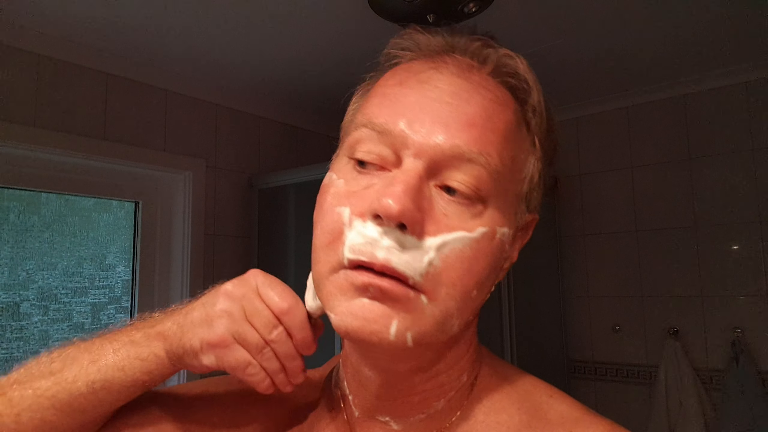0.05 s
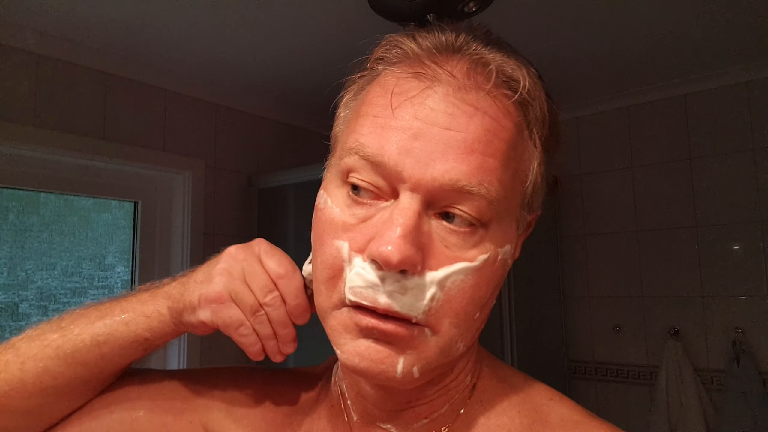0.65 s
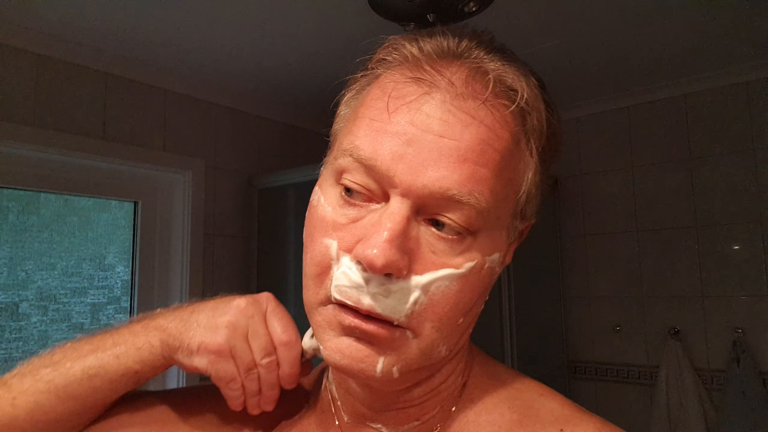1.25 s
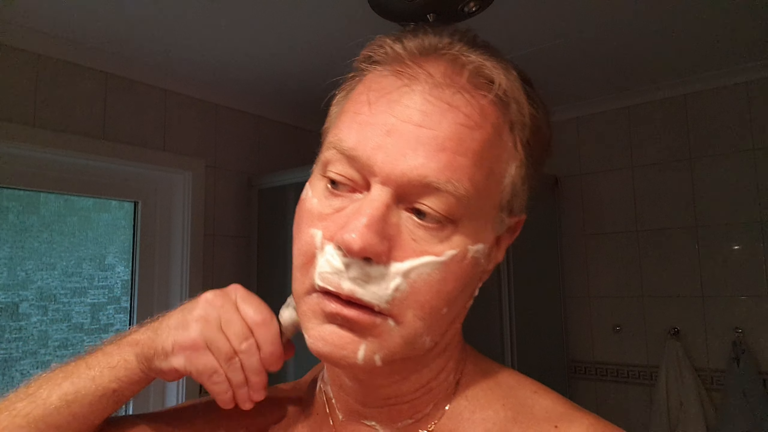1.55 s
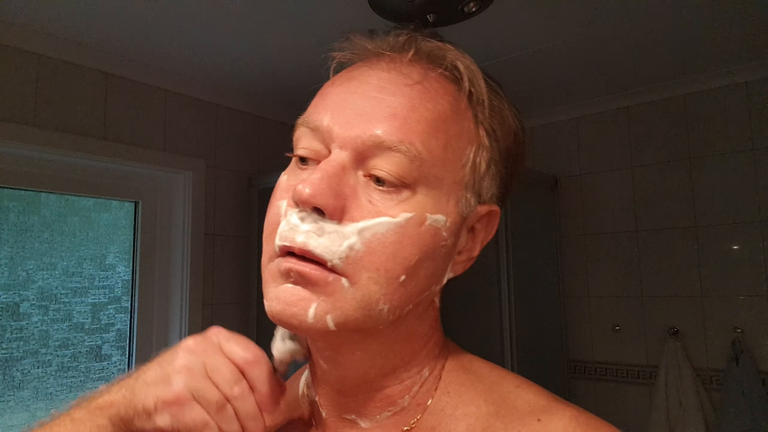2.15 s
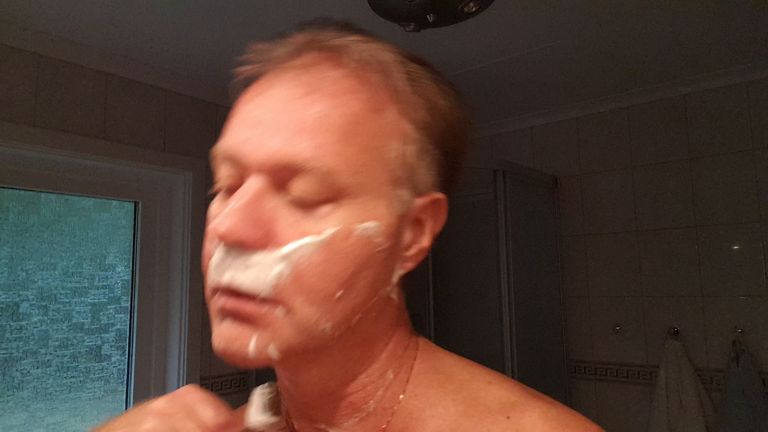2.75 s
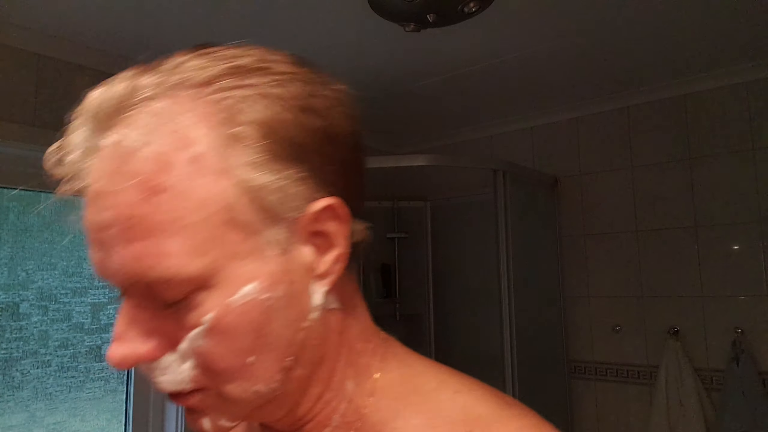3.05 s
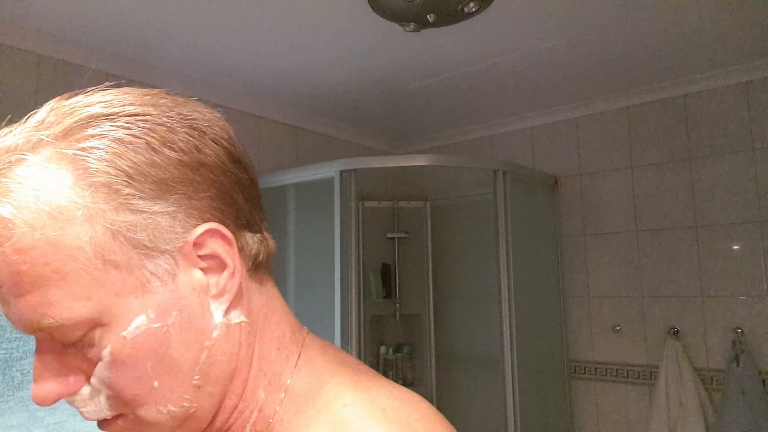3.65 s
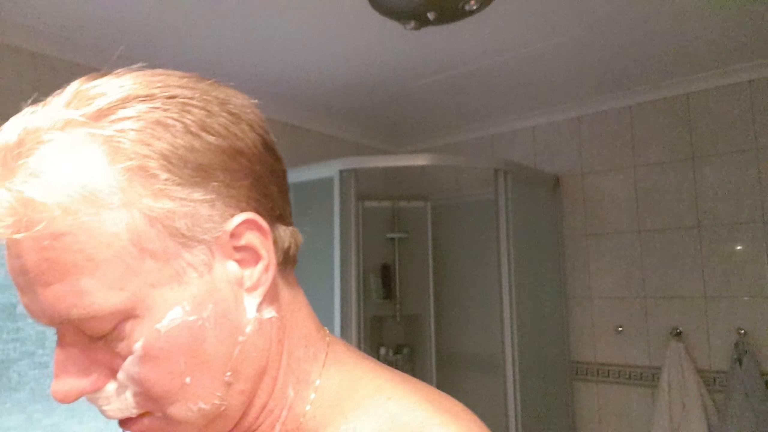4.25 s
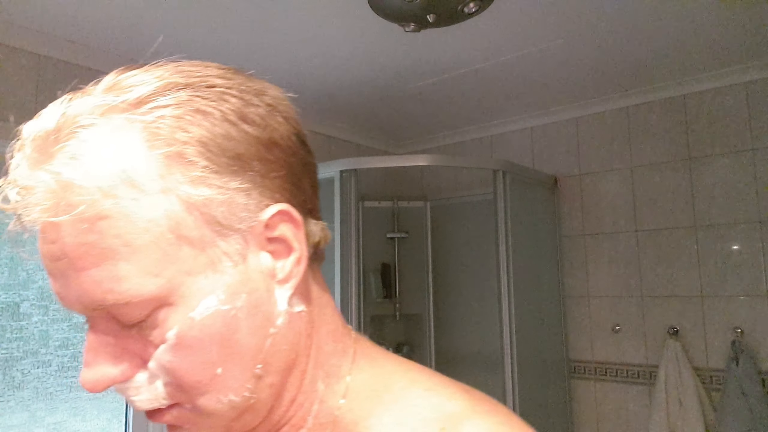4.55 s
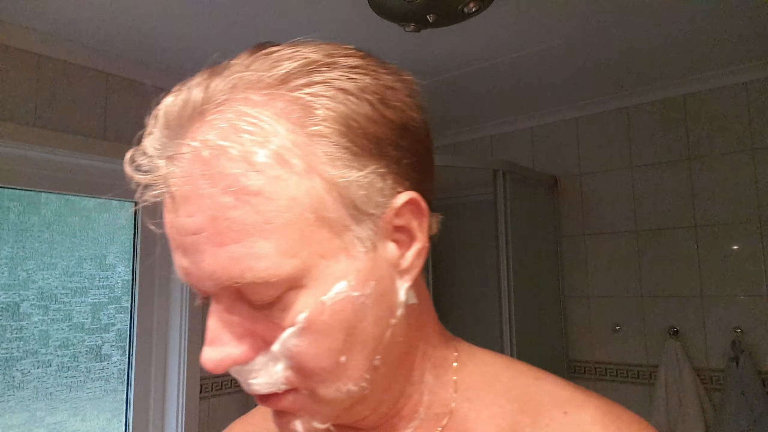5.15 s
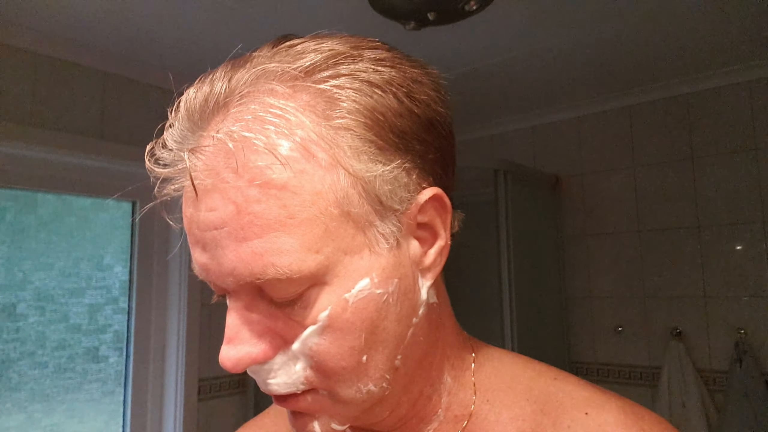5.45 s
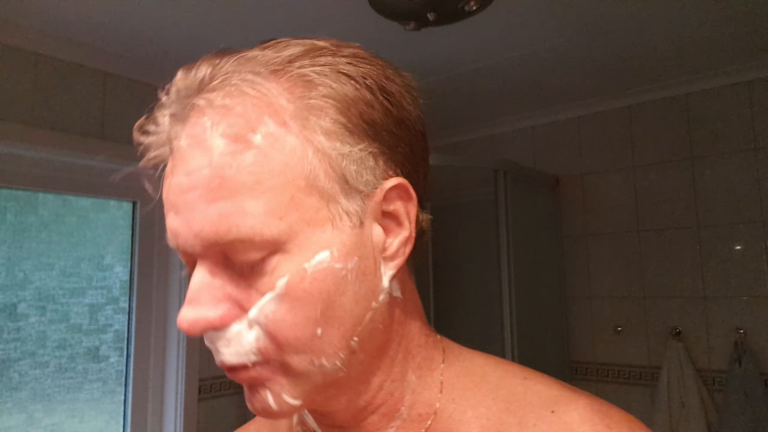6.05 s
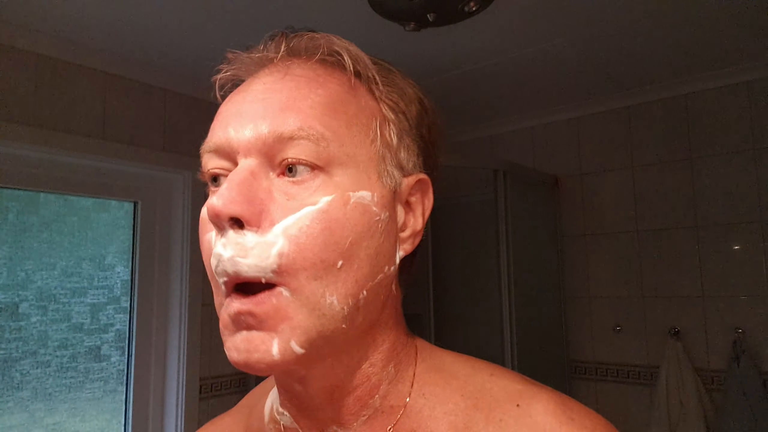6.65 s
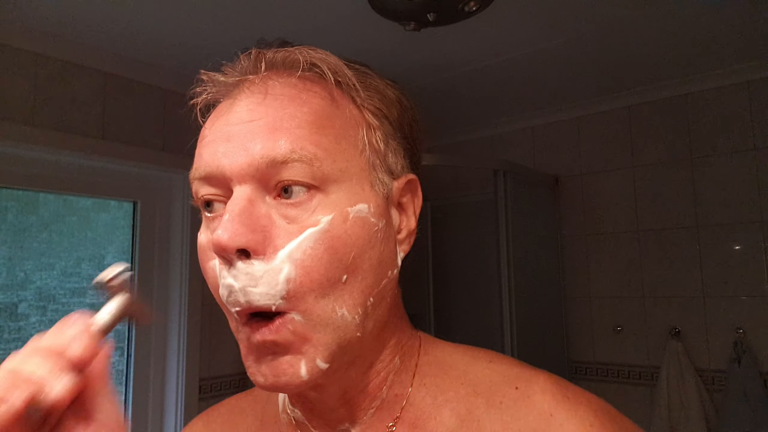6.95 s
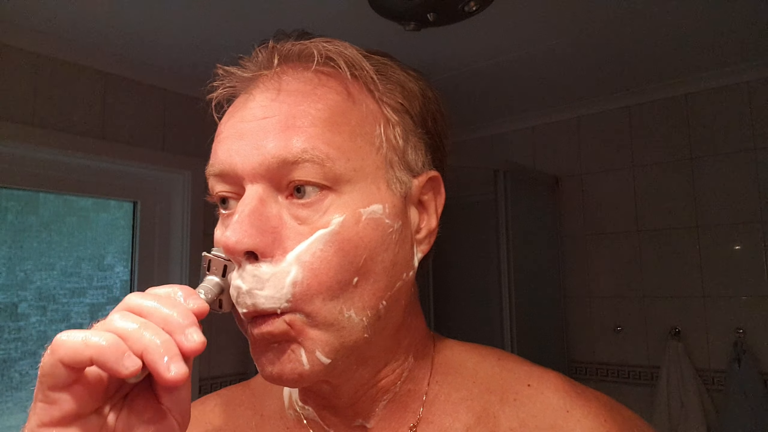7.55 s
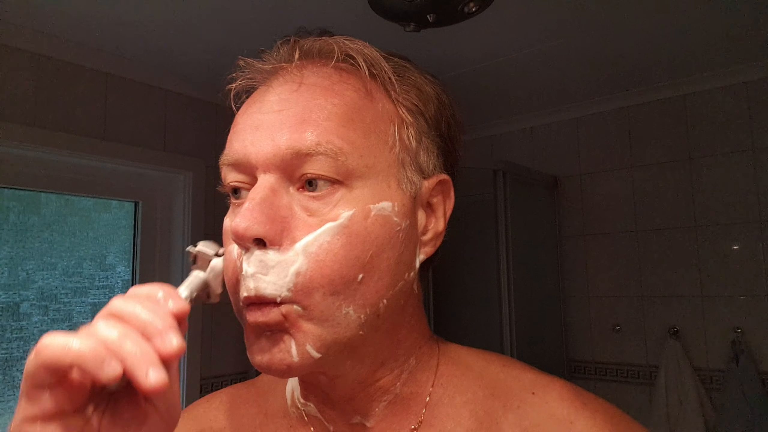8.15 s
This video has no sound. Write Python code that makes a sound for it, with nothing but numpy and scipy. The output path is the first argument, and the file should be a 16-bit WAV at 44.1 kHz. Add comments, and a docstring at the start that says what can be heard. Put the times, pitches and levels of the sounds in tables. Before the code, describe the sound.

Short razor strokes on stubble come before and after a few seconds of rinsing under a running tap, with a glugging drain.

```python
"""Over the low hum of ventilation in a small tiled bathroom, a man shaves his neck in a few strokes,
each cut hair a tiny impulse. At 3.5 s the tap lever knocks; the jet then breaks into hissing drops
and splashes as he rinses the razor. From 4.2 s bubbles glug and excite the air in the waste pipe.
The tap shuts at 6.5 s and the drain slurps dry. Last, at 7.7 s, comes one stroke on the upper lip."""
import sys
import numpy as np
from scipy import signal
from scipy.fft import rfft, irfft
from scipy.io import wavfile

SR = 44100
rng = np.random.default_rng(int(sys.argv[2]) if len(sys.argv) > 2 else 0)


def wrap_up_sound(samples):
    """Save the sound to the file named by the first command line argument, as 16-bit audio."""
    columns = np.atleast_2d(samples).T
    # keep every value between -1 and 1, then stretch to whole-number steps
    tamed = np.clip(columns, -1, 1)
    steps = np.round(tamed * 32767).astype(np.int16)
    wavfile.write(sys.argv[1], SR, steps)


N = 370440
TIME = np.arange(N) / SR
TAP_OPEN_S, TAP_SHUT_S, DRAIN_DRY_S = 3.715, 6.5, 7.07

# Spectrum of the blade on the neck. Each row: frequency in Hz, relative level in dB.
NECK_SPECTRUM = [(800, -46), (1150, -14.5), (1600, -8), (2100, -21), (3300, -13), (4000, -18), (5000, -14),
                 (6400, -11), (8500, -4.5), (11100, 1.5), (14800, -3), (16000, -0.5)]
# Churning once the trap has filled. Each row: time in seconds, relative level in dB.
CHURN_CURVE = [(4.17, -69.5), (4.2, -52), (4.72, -46.5), (4.75, -44.5), (5.81, -44), (5.83, -40),
               (6.58, -39.5), (6.67, -49), (6.86, -41), (7.55, -76.5)]


def shaving():
    """Skin and stubble colour the blade's excitation, so neck and lip each have their own spectrum."""
    # Strokes on the neck. Each row: start, time to full bite and length in seconds, then
    # relative cutting level, relative rubbing level and easing of the bite in dB.
    neck_strokes = [(0.06, 0.15, 0.26, -51.5, -82.5, 1), (0.79, 0.18, 0.35, -68, -82.5, 1.5),
                    (1.18, 0.02, 0.13, -64, -75, 15), (1.735, 0.082, 0.2, -57, -74, 6),
                    (2.283, 0.012, 0.17, -50, -79.5, 20.5), (2.7, .035, .17, -77, -85.5, 0)]
    # Short pulls on the upper lip, with the same columns.
    lip_pulls = [(7.68, 0.074, 0.26, -54.5, -66, 5.5), (7.865, 0.039, 0.17, -54.5, -59, 2.3),
                 (7.99, .088, 0.084, -48, -61, 3)]
    # Spectrum of the blade on the lip. Each row: frequency in Hz, relative level in dB.
    lip_spectrum = [(1000, -22), (1600, -12.5), (2100, -22), (2850, -25), (3250, -4), (3650, -21),
                    (4200, -7), (5100, -6), (5700, -11), (6600, -9.5), (7900, 4), (9300, -3.5), (12200, 5),
                    (16000, 4.5)]
    neck = stubble(neck_strokes, NECK_SPECTRUM, 760, spread_db=6, rub_share=0.85, cut_db=2, rub_db=5)
    lip = stubble(lip_pulls, lip_spectrum, 510, spread_db=8, rub_share=0.8, cut_db=5, rub_db=-5.5)
    return neck + lip


def stubble(strokes, spectrum, hairs_per_s, spread_db, rub_share, cut_db, rub_db):
    """Shot noise and friction: each cut hair is a tiny burst above the duller rubbing of the skin."""
    cutting, rubbing = np.max([stroke(*row) for row in strokes], 0)
    fade = np.exp(-np.arange(SR // 100) / SR / 0.00045)
    bursts = unit_rms(signal.oaconvolve(abs(clicks(hairs_per_s, spread_db)), fade)[:N])
    scrape = colour((bursts + rub_share) * rng.standard_normal(N), spectrum)
    crisp = unit_rms(butter(scrape, 3520, "high"))
    dull = unit_rms(butter(scrape, 5240, "low", order=6))
    return amp(cut_db) * cutting * crisp + amp(rub_db) * rubbing * dull


def stroke(start, bite_s, length, cut_db, rub_db, ease_db):
    """Contact sets the gains of cutting and rubbing as the blade lands, bites, eases off and lifts."""
    bite_db = np.interp(TIME - start, [0, bite_s, max(length, bite_s)], [-18, 0, -ease_db])
    contact = envelope(start, start + length, rise_s=0.0024, fall_db_per_s=257)
    return contact * amp([cut_db + bite_db, rub_db + 0.49 * bite_db])


def chatter():
    """Stick-slip friction of the blade rings a resonance that slides as the skin stretches."""
    # Each row: start and length in seconds, relative level in dB, first and last pitch in Hz.
    drags = [(0.05, 0.31, -72.5, 2830, 2400), (0.17, 0.18, -67, 5100, 4570), (1.76, 0.13, -70, 3200, 3700),
             (2.31, .17, -74.5, 1750, 1800), (7.87, 0.17, -58, 4260, 4200)]
    return amp(1) * gliding_rasps(drags, pole_width_hz=640, kicks_per_s=1400)


def snaps(gain_db=1, decay_s=0.00031):
    """Sudden release: stiff hairs and foam snap at the blade, each with one broadband tick."""
    # Each row: time in seconds, relative peak level in dB.
    releases = [(0.367, -37.5), (1.4691, -57), (2.0868, -50.5), (2.3004, -44), (2.5522, -44.5),
                (2.855, -45.5), (7.658, -48), (7.717, -46.5), (7.7593, -54), (7.779, -48), (7.857, -47)]
    out, t = np.zeros(N), np.arange(SR // 40) / SR
    for s, db in releases:
        tick = colour(rng.standard_normal(len(t)) * np.exp(-t / decay_s), NECK_SPECTRUM)
        add(out, s, amp(db + gain_db) * tick / abs(tick).max())
    return out


def tap(hiss_share=0.53, flutter_db=2.5):
    """Impact noise: the aerated jet breaks into thousands of drops on the basin, in uneven gushes."""
    # Each row: frequency in Hz, relative level in dB.
    water_spectrum = [(590, -51.5), (1000, -4), (1500, 0), (1960, -4.5), (2150, -4), (2330, -5),
                      (3340, 1.5), (3670, -3), (5070, -4.5), (5700, -9), (6940, -3), (10200, -2),
                      (11400, -0.5), (14900, -7), (16000, -6.5)]
    spray, splash = jet_gains()
    drops = clicks(per_s=3000, spread_db=6)
    gush = amp(flutter_db * wander(120))
    water = colour((drops + hiss_share * rng.standard_normal(N)) * gush, water_spectrum)
    fine = unit_rms(butter(water, 4730, "high"))
    coarse = unit_rms(butter(water, [1200, 5200], "band"))
    return amp(2) * spray * fine + amp(3) * splash * coarse


def jet_gains(rise_s=0.032, entry_s=0.03):
    """Fine spray and coarse splashing follow the flow, and jump when the razor obstructs the jet."""
    # The razor in the jet. Each row: start and length in seconds, change of spray and of splash in dB.
    rinses = [(4.31, 0.098, 3.5, 5.5), (4.524, 0.15, 3.5, 3), (4.732, 0.17, 2.5, 4.5), (4.95, 0.14, 6, 3.5),
              (5.295, 0.084, 3, 5), (5.456, 0.049, 7.5, 3), (5.575, 0.097, 4, 3.5), (5.947, .19, 7, 1),
              (6.183, 0.34, 5, -1.5)]
    flow = envelope(TAP_OPEN_S, TAP_SHUT_S, rise_s, fall_db_per_s=147.5)
    flow *= amp(0.94 * (TIME - TAP_OPEN_S))  # the lever is eased up
    fizz = amp(-19) * envelope(TAP_SHUT_S, TAP_SHUT_S, rise_s, fall_db_per_s=32.5)  # water left behind
    spray_db, splash_db = -46, -55
    for s, length, extra_spray_db, extra_splash_db in rinses:
        in_jet = np.clip(0.5 + np.minimum(TIME - s, s + length - TIME) / entry_s, 0, 1)
        spray_db += extra_spray_db * in_jet
        splash_db += extra_splash_db * in_jet
    return np.maximum(flow, fizz) * amp(spray_db), flow * amp(splash_db)


def droplets(decay_cycles=11, count=900):
    """Bubble resonance: air trapped by the splashing rings briefly, rising in pitch."""
    out, t = np.zeros(N), np.arange(SR // 50) / SR
    for when, pitch, weakness in rng.random((count, 3)):
        hz = 2000 * 3.5 ** pitch
        age = t * hz / decay_cycles
        plink = np.exp(-age) * np.sin(2 * np.pi * hz * t * (1 + 0.025 * age))
        add(out, TAP_OPEN_S + when * (TAP_SHUT_S - TAP_OPEN_S), plink / np.sqrt(weakness + 0.01))
    _, splash = jet_gains()
    return amp(-5) * splash * unit_rms(out)


def splats(gain_db=2, decay_cycles=14):
    """Damped impacts: slugs of water off the razor slap the basin; larger, lower ones last longer."""
    # Each row: time in seconds, relative peak level in dB, centre frequency in Hz.
    slugs = [(4.1935, -33, 3960), (4.4955, -24.5, 5200), (4.523, -29, 2720), (4.7335, -27, 3760),
             (4.7531, -31.5, 3400), (4.8505, -33.5, 1350), (5.0283, -20, 6700), (5.0614, -25.5, 9000),
             (5.1734, -25.5, 3240), (5.3374, -25, 3440), (5.5122, -30, 3920), (5.567, -29, 3850)]
    out, t = np.zeros(N), np.arange(SR // 12) / SR
    for s, db, hz in slugs:
        burst = rng.standard_normal(len(t)) * np.exp(-t * hz / decay_cycles)
        slap = ring(burst, hz, 0.24 * hz)
        add(out, s, amp(db + gain_db) * slap / abs(slap).max())
    return out


def basin():
    """Forced vibration: the jet drums on the bowl and drives its modes."""
    # Each row: frequency and bandwidth in Hz, relative level in dB.
    bowl_modes = [(231.3, 37, -2.5), (337.5, 64, -2), (530, 59, -10.5), (712, 75, 0.5), (1382, 71, -12.5)]
    _, splash = jet_gains()
    return splash * noisy_modes(bowl_modes)


def drain(pops_per_s=260, spread_db=4.5):
    """Air-column resonance: bursting bubbles ring the waste pipe; churning drives its lowest mode."""
    # Each row: frequency and bandwidth in Hz, relative level in dB.
    pipe_modes = [(386.7, 52, -0.5), (734, 80, -5), (885, 59, -7.5), (1162, 110, -11.5), (1370, 150, -14),
                  (1535, 62, -9), (1692, 59, -16), (2180, 36, -25)]
    times, churn_db = np.transpose(CHURN_CURVE)
    churn = amp(np.interp(TIME, times, churn_db, left=-140, right=-140))
    draining = envelope(times[0], DRAIN_DRY_S, rise_s=0.025, fall_db_per_s=89)
    bubbling = draining * (churn / churn.max()) ** 0.31
    common_pops = clicks(pops_per_s, spread_db)
    lowest, *upper = [amp(db) * ring(common_pops + clicks(pops_per_s, spread_db), hz, width)
                      for hz, width, db in pipe_modes]
    return amp(-4) * churn * lowest + amp(-52.5) * bubbling * unit_rms(sum(upper))


def glugs(gain_db=-1, swell_s=0.0068, rise_per_s=0.61, count=24):
    """Damped oscillation: a big bubble swells and dies, gliding up and stirring the pipe's second mode."""
    # Each row: time in seconds, relative peak level in dB, pitch in Hz.
    big_bubbles = [(4.206, -41, 395), (4.613, -34.5, 416), (4.754, -33, 364), (4.807, -31.5, 384),
                   (4.954, -32.5, 403), (5.066, -45, 363), (5.186, -32, 301), (5.346, -29, 359),
                   (5.832, -29, 392), (5.85, -32, 361), (5.902, -34, 364), (6.022, -30.5, 334),
                   (6.049, -27.5, 323), (6.116, -30, 374), (6.157, -29.5, 303), (6.456, -30, 404),
                   (6.496, -29.5, 330), (6.548, -27.5, 340), (6.806, -32, 380.5), (6.847, -34, 386),
                   (6.994, -35, 397)]
    out, t = np.zeros(N), np.arange(SR // 10) / SR
    swell = t / swell_s * np.exp(1 - t / swell_s)
    # Lesser bubbles come at random, as loud as the churning allows.
    times, churn_db = np.transpose(CHURN_CURVE)
    jitter, pitch = rng.random((count, 2)).T
    starts = times[0] + (np.arange(count) + jitter) / count * (DRAIN_DRY_S - times[0])
    lesser = zip(starts, np.interp(starts, times, churn_db) + 5, np.interp(pitch, [0, 1], [273, 408.6]))
    for s, db, hz in [*big_bubbles, *lesser]:
        cycles = hz * t * (1 + rise_per_s * (t / 2 - swell_s))
        overtone = amp(-16) * np.sin(2 * np.pi * rng.uniform(680, 900) * t)
        add(out, s, amp(db + gain_db) * swell * (np.sin(2 * np.pi * cycles) + overtone))
    return out


def slurp():
    """Air entrainment: air sucked down with the last water rasps and whistles."""
    # Each row: start and length in seconds, relative level in dB, first and last pitch in Hz.
    gulps = [(6.96, 0.11, -47.5, 520, 840), (6.68, 0.38, -60, 1300, 1550), (6.98, 0.14, -53, 1470, 1520),
             (6.88, 0.25, -74, 5000, 5300), (6.95, 0.15, -72.5, 7900, 8800)]
    return gliding_rasps(gulps, pole_width_hz=480, kicks_per_s=3600)


def pops():
    """Pressure release: bubbles burst sharply at the plughole."""
    # Each row: time in seconds, relative level in dB, lower and upper band edge in Hz, T60 in seconds.
    bursts = [(4.496, -34, 605, 794, 0.05), (6.694, -52, 1090, 2050, 0.06), (6.808, -43, 716, 955, 0.032),
              (6.845, -45.5, 740, 1560, 0.095), (6.995, -35, 506, 755, 0.13)]
    return blows(bursts, gain_db=6.5)


def knocks():
    """Impact excitation: the tap lever and pipes knock dully; soft bumps accompany the lip stroke."""
    # Each row: time in seconds, relative level in dB, lower and upper band edge in Hz, T60 in seconds.
    impacts = [(3.481, -60, 250, 1900, 0.5), (3.607, -54.5, 101, 2210, 1), (3.62, -35, 49.7, 590, 0.37),
               (3.645, -45, 91, 614, 0.19), (6.41, -32, 212, 280, 0.8), (6.428, -22.5, 55.5, 136, 0.22),
               (6.495, -24.5, 55.5, 86, 0.31), (7.79, -40.5, 70.4, 122, 0.44), (7.902, -46, 210, 290, 0.57),
               (8.013, -52.5, 470, 608, 0.5)]
    return blows(impacts, gain_db=1)


def ventilation(waver_db=3):
    """Turbulence excites the duct's modes, the fan adds faint tones, and a thin hiss lies over both."""
    # Each row: frequency and bandwidth in Hz, relative level in dB.
    duct_modes = [(56, 6.3, -15), (74.6, 11, 1), (85.5, 4, -10), (106.1, 6.2, 2.5), (124.7, 12, -4.5),
                  (147.6, 4.8, -6.5)]
    # Each row: frequency in Hz, mean level in dB.
    fan_tones = [(215.3, -80), (290.7, -81.5), (339.1, -73)]
    # Each row: frequency in Hz, relative level in dB.
    air_spectrum = [(100, -2), (190, -1.5), (260, 3), (400, -5), (500, -17), (630, -22), (1000, -22.5),
                    (1700, -22), (2500, -25), (4000, -28.5), (6400, -34.5), (10000, -30.5), (13000, -25),
                    (16000, -26)]
    rumble = amp(-56.5) * noisy_modes(duct_modes)
    hum = sum(amp(db - waver_db * wander(9.8)) * np.sqrt(2) * np.sin(2 * np.pi * hz * TIME)
              for hz, db in fan_tones)
    air = amp(-69.5) * np.array([unit_rms(colour(n, air_spectrum)) for n in rng.standard_normal((2, N))])
    low = rumble + hum + butter(air[0], 550, "low")
    return low * amp([[1], [-1]]) + amp(3) * butter(air, 540, "high")


def room(x, wet_db, left_db, lag_ms, paths=1):
    """Superposition of direct sound and echoes; a moving source shifts among several echo paths."""
    shares = np.array([wander(40) for _ in range(paths)]) if paths > 1 else np.ones((1, N))
    shares /= np.linalg.norm(shares, axis=0)
    wet = sum(signal.oaconvolve((x * share)[None], echoes(), axes=1)[:, :N] for share in shares)
    direct = np.array([x, np.roll(x, round(lag_ms * SR / 1000))])
    balance = amp([[left_db / 2], [-left_db / 2]])
    return (direct + amp(wet_db) * wet) * balance / np.sqrt(1 + amp(2 * wet_db))


def echoes(mono_hz=560, size=256):
    """Diffuse field: the tiles return a dense tail to each side; long waves reach both alike."""
    # Each row: frequency in Hz, reverberation time T60 in seconds.
    tile_decay = [(100, 0.69), (400, 0.37), (1500, 0.3), (5000, 0.28), (10000, 0.24), (16000, 0.31)]
    shape = (2, SR // 2)
    reflections = rng.standard_normal(shape) * (rng.random(shape) < 0.1)
    hz, t, spectra = signal.stft(reflections, SR, nperseg=size)
    coherence = 1 / (1 + (hz[:, None] / mono_hz) ** 6)
    spectra[1] = coherence * spectra[0] + np.sqrt(1 - coherence ** 2) * spectra[1]
    decay = amp(-60 * t / value_at(tile_decay, hz)[:, None])
    tail = signal.istft(spectra * decay, SR, nperseg=size)[1]
    tail[:, :SR // 600] = 0  # gap before the first reflection
    return tail / np.linalg.norm(tail[0])


def gliding_rasps(rasps, pole_width_hz, kicks_per_s, swell_db=9.5):
    """An impulse train drives a resonance that glides while it swells and fades."""
    kicks = clicks(kicks_per_s, spread_db=4.5)
    out, pole = np.zeros(N), np.exp(-np.pi * pole_width_hz / SR)
    for s, length, db, first_hz, last_hz in rasps:
        t = np.arange(0, length, 1 / SR)
        carrier = np.exp(2j * np.pi * np.cumsum(np.linspace(first_hz, last_hz, len(t))) / SR)
        baseband = signal.lfilter([1], np.poly([pole, pole]), np.interp(s + t, TIME, kicks) / carrier)
        arch = amp(db - swell_db * (2 * t / length - 1) ** 2)
        add(out, s, arch * unit_rms((carrier * baseband).real))
    return out


def blows(rows, gain_db):
    """Free decay: each blow sets a band of close modes shuddering."""
    out, t = np.zeros(N), np.arange(SR // 2) / SR
    for s, db, low_hz, high_hz, t60 in rows:
        shudder = butter(rng.standard_normal(SR), [low_hz, high_hz], "band")[-len(t):]
        fade = amp(-60 * t / t60) * (1 - np.exp(-2 * t * high_hz)) ** 2
        add(out, s, amp(db + gain_db) * unit_rms(shudder * fade) * np.sqrt(np.mean(fade ** 2)) / 2)
    return out


def noisy_modes(modes):
    """Modal sum, each mode driven by its own noise, at rms 1."""
    return unit_rms(sum(amp(db) * ring(rng.standard_normal(N), hz, width) for hz, width, db in modes))


def ring(x, hz, width):
    """Two resonators in cascade give one peak with steep skirts, at rms 1."""
    b, a = signal.iirpeak(hz, hz / (1.55 * width), SR)
    return unit_rms(signal.lfilter(b, a, signal.lfilter(b, a, x)))


def colour(x, spectrum, size=4096):
    """Minimum-phase filter with the given spectrum, so that clicks keep their sharp front."""
    log_gain = np.log(amp(value_at(spectrum, abs(np.fft.fftfreq(size, 1 / SR)))))
    taps = np.fft.ifft(np.exp(np.conj(signal.hilbert(log_gain)))).real
    return signal.oaconvolve(x, taps[:size // 2])[:len(x)]


def butter(x, hz, kind, order=4):
    """Butterworth filter."""
    return signal.sosfilt(signal.butter(order, hz, kind, fs=SR, output="sos"), x)


def clicks(per_s, spread_db):
    """Poisson impulses, most of them small and a few large, at rms 1."""
    size = amp(spread_db * np.minimum(rng.exponential(1, N), 4))
    return unit_rms(size * rng.choice([-1, 1], N) * (rng.random(N) < per_s / SR))


def wander(hz):
    """Random fluctuation, rolling off above hz, at rms 1."""
    f = np.fft.rfftfreq(N, 1 / SR)
    return unit_rms(irfft(rfft(rng.standard_normal(N)) * np.exp(-(f / hz) ** 2), N))


def envelope(start_s, end_s, rise_s, fall_db_per_s):
    """Linear attack, hold and exponential release, as a gain."""
    attack = np.clip((TIME - start_s) / rise_s, 0, 1)
    return attack * amp(-fall_db_per_s * np.maximum(TIME - end_s, 0))


def value_at(points, hz):
    """Interpolates rows of frequency and value on a log-frequency axis."""
    f, value = np.transpose(points)
    return np.interp(np.log(hz + 1), np.log(f + 1), value)


def add(mix, s, sound):
    """Mixes a sound in at s seconds."""
    part = mix[round(s * SR):][:len(sound)]
    part += sound[:len(part)]


def amp(db):
    """Decibels to gain."""
    return 10 ** (np.asarray(db) / 20)


def unit_rms(x):
    """Scales to rms 1."""
    return x / np.sqrt(np.mean(x ** 2) + 1e-20)


def scene():
    """Distance sets the share of echo: the face is near, the jet below is heard mostly via the room."""
    razor = room(shaving() + chatter(), wet_db=0, left_db=2, lag_ms=0.1, paths=3)
    ticks = room(snaps(), wet_db=-3, left_db=1, lag_ms=0)
    water = room(tap() + droplets(), wet_db=13, left_db=3.5, lag_ms=0.3, paths=5)
    slaps = room(splats(), wet_db=2, left_db=7, lag_ms=0.05)
    pipe = room(drain() + slurp(), wet_db=4, left_db=1.5, lag_ms=0.05, paths=3)
    bowl = room(glugs() + basin() + pops(), wet_db=-6.5, left_db=-1.5, lag_ms=0)
    thuds = room(knocks(), wet_db=-8, left_db=1.5, lag_ms=0.1)
    return razor + ticks + water + slaps + pipe + bowl + thuds + ventilation()


def record(dry):
    """Band limiting: a steep linear-phase low-pass removes the highest treble."""
    lowpass = signal.firwin(511, 15950, window=("kaiser", 9), fs=SR)
    return signal.oaconvolve(dry, lowpass[None], "same")


dry = scene()
out = record(dry)
wrap_up_sound(out)
```